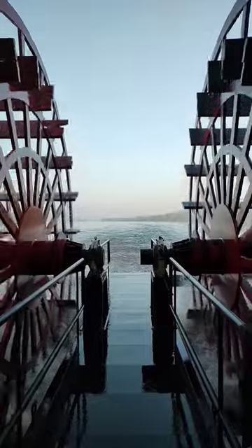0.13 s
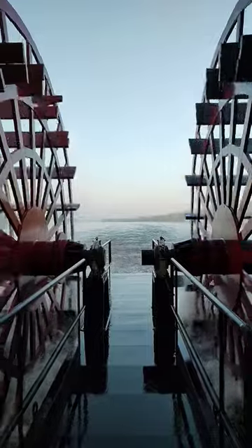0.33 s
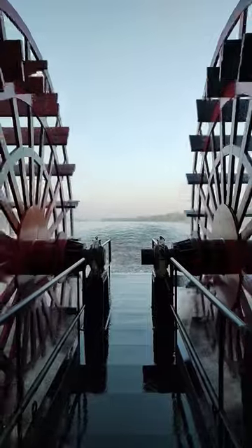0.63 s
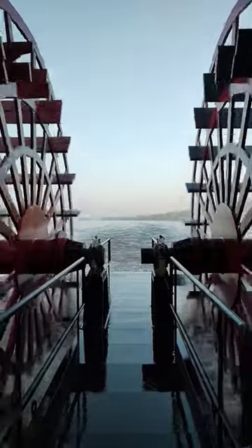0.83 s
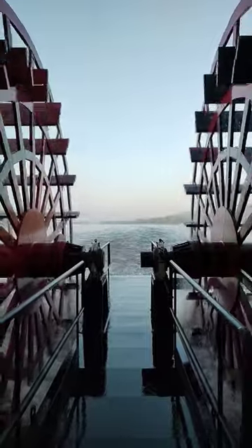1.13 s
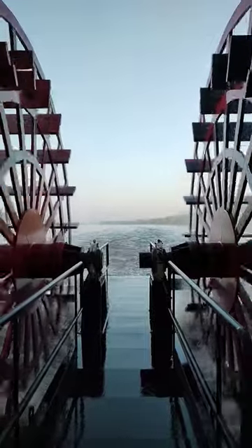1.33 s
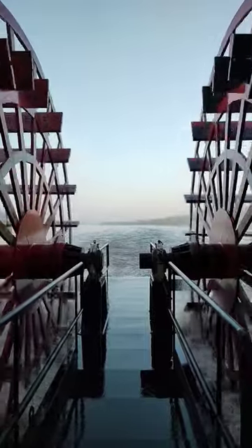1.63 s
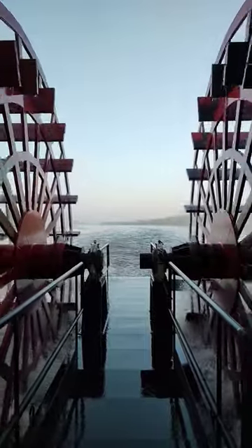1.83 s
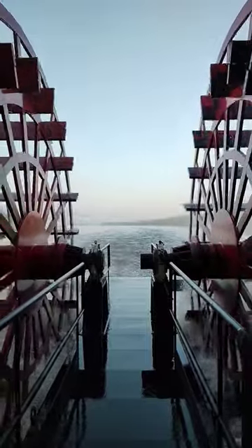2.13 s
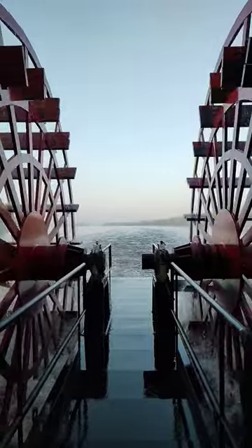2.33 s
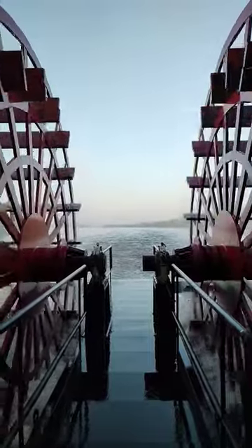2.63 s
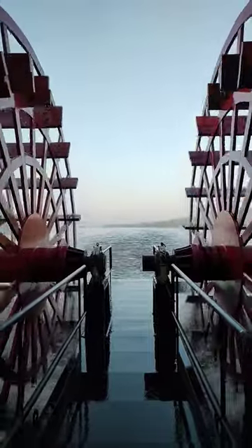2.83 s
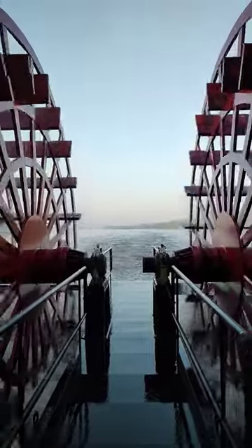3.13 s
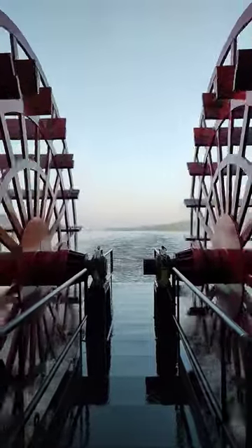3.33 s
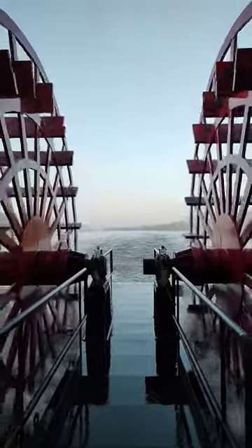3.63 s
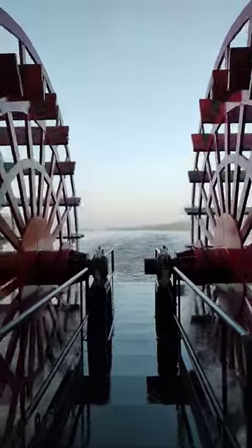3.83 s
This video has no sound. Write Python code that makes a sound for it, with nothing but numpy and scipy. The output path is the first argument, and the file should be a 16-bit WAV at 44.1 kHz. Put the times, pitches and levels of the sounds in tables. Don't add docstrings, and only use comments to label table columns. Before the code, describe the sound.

Paddle wheels throw water beside a boat's stern deck. Silence until 0.3 s, then an abrupt, near-full-scale broadband rush. Bright hissing spray swells gently about every 0.2 s, over bubbling wash, low engine drone, faint pump hum, gear whine and ringing metal. Churn is steady to 2.4 s; deep rumble surges near 2.5 and 2.95 s, wash grows fuller until 4 s. Outdoors, nearly mono, sharp treble, lightly saturated.

```python
import sys
import numpy as np
from scipy import signal
from scipy.fft import rfft, irfft, next_fast_len
from scipy.io import wavfile
from scipy.ndimage import uniform_filter1d, map_coordinates

SR = 44100
rng = np.random.default_rng(int(sys.argv[2]) if len(sys.argv) > 2 else 0)


def undo_db(level):
    steps = np.asarray(level, float) / 20
    return 10 ** steps


def output_pcm(signal):
    pcm = np.clip(np.atleast_2d(signal).T, -1, 1) * 32767
    wavfile.write(sys.argv[1], SR, np.round(pcm).astype(np.int16))


N = 176400
T = np.arange(N) / SR

# peak_s, hiss_swell_db, splash_swell_db, length_s
PADDLES = [(0.33, 3, 3, 0.069), (0.536, 2.5, 3.5, 0.17), (0.67, 2.5, 2, 0.16), (0.835, 3.5, 4, 0.18),
           (1.154, 3, 2.5, 0.28), (1.422, 3, 3.5, 0.19), (1.606, 1.5, 2, .08), (1.727, 4, 4, 0.15),
           (1.988, 4, 3, 0.21), (2.115, 2, 1.5, 0.092), (2.286, 3.5, 4, 0.072), (2.48, 2.5, 2, 0.12),
           (2.677, 2.2, 3, 0.18), (2.877, 1.2, 2, .14), (3.132, 2.5, 2, 0.22), (3.325, 1.3, 0.2, .15),
           (3.538, 2.5, 2, 0.18), (3.7, 4, 4.5, 0.11), (3.946, 3, 2.5, 0.17)]
# time_s, level_db
CHURN = [
    (.32, -23.5),
    (.43, -24),
    (.5, -21.5),
    (.58, -24.5),
    (2, -24.5),
    (2.36, -25),
    (2.55, -22.5),
    (3, -22),
    (3.55, -21),
    (4, -21),
]
# time_s, level_db
LOAD = [(0.4, -25.5), (0.58, -24.5), (0.99, -25.5), (1.01, -24.5), (2.37, -24.5), (2.51, -20),
        (2.54, -25.5), (2.95, -20.5), (3.32, -21.5), (3.33, -23.5), (3.4, -22), (4.0, -21.5)]
# freq_hz, density_db
HISS_SPECTRUM = [(3300, -44), (5600, -12.5), (6200, -6), (6900, -0.5), (7850, 1.5), (8600, -5.5),
                 (11500, -35.5), (15000, -55), (22000, -120)]
# freq_hz, density_db
SPLASH_SPECTRUM = [(1240, -30), (2100, -15), (2360, -16), (2810, -11.5), (3240, -0.5), (3800, -5),
                   (4300, -0.5), (6000, -2.5), (7800, -23), (13200, -120)]
# freq_hz, density_db
WASH_SPECTRUM = [(260, -38), (450, -2.5), (483, -6), (549, -6.5), (957, -3), (1450, -4.5), (1890, -1.5),
                 (2310, -12), (3000, -13), (3900, -43), (6600, -120)]
# freq_hz, density_db
MIST_SPECTRUM = [(5000, -45), (8600, 0), (10000, -5.5), (11800, -14), (13600, -13.5), (14600, -13.5),
                 (15300, -13), (15500, -11.5)]
# freq_hz, density_db
HULL_SPECTRUM = [(40, -23), (70, -9.5), (100, -3.5), (135, -3.5), (180, -3), (290, -1.5), (400, -3.5),
                 (530, -19.5), (800, -38), (1300, -120)]
# freq_hz, density_db
THUD_SPECTRUM = [(18, -50), (30, -25), (48, -7), (110, -1), (140, -37), (240, -120)]
ENGINE_HZ = [93, 120.3, 135, 160.7, 192, 201, 339, 396, 474]
# level_over_load_db, width_hz
ENGINE_LINES = [(-14, 11), (-8, 4.2), (-16, 12), (-9, 3.5), (-15.5, 5.5), (-14.5, 4.1), (-10.5, 14.4),
                (-15.5, 22), (-19.5, 8.4)]
PUMP_HZ = [749, 1720, 1772, 1891, 1934.7, 1966]
# level_over_churn_db, width_hz
PUMP_LINES = [(-21, 11), (-27, 7), (-18, 18), (-14, 16), (-13.5, 5.7), (-20, 18)]
# shaft_multiple, level_db
GEAR_LINES = [(51, -41), (52, -37), (53, -40), (54, -45), (55, -47), (56, -44)]
PANEL_HZ = [3365, 3972, 4480, 6853, 13571]
# level_db, width_hz
PANEL_LINES = [(-45, 50), (-54, 4.2), (-39, 170), (-32, 75), (-62, 40)]
# time_s, low_hz, high_hz
SIDE_BANDS = [(1.372, 4150, 5800), (1.372, 11700, 13100), (1.651, 6900, 8350), (1.651, 10350, 11750),
              (1.767, 13800, 15200), (1.813, 10350, 11750), (2.464, 5150, 6300), (2.464, 9650, 11750),
              (2.487, 13050, 15200), (2.696, 7550, 9050), (3.346, 8950, 10400), (3.346, 11000, 12500)]

START_S, RISE_S = 0.3097, 0.0012
TOP_HZ = 15480


def spray():
    hiss_swell_db, splash_swell_db = swells()
    churn_db = curve(CHURN)
    grown_db = uniform_filter1d(churn_db, size=SR // 2) - churn_db.min() - 1
    flutter_db = 0.5 * wobble(14) + 0.45 * wobble(45)
    hiss_db = -15.5 + hiss_swell_db - 0.083 * grown_db
    splash_db = -22.5 + splash_swell_db - 0.82 * grown_db
    hiss = undo_db(hiss_db) * coloured(wet_noise(depth_db=0.5), HISS_SPECTRUM)
    splash = undo_db(splash_db) * coloured(wet_noise(depth_db=1.0), SPLASH_SPECTRUM)
    return undo_db(flutter_db) * (hiss + splash)


def swells():
    peak_s, hiss_db, splash_db, length_s = np.transpose(PADDLES)
    coarse_s = T[::100]
    bumps = np.exp(-(2 * (coarse_s[:, None] - peak_s) / length_s) ** 2)
    return [np.interp(T, coarse_s, bumps @ db) for db in (hiss_db, splash_db)]


def wet_noise(depth_db):
    droplets = grains(per_s=2500, hz=5900, spread=0.4, cycles=3.3, scatter_db=4.0, size=64)
    return patchy(depth_db) + undo_db(-12.5) * droplets


def wash():
    surge_db = swells()[0]
    churn_db, load_db = curve(CHURN), curve(LOAD)

    bubbles = grains(per_s=500, hz=1218, spread=0.613, cycles=6.4, scatter_db=1.9, size=512)
    body_db = -1.5 + 0.72 * surge_db + 0.86 * wobble(12)
    body = undo_db(body_db) * coloured(patchy(depth_db=-1.0) + undo_db(-17.5) * bubbles, WASH_SPECTRUM)

    mist_db = -1 - 0.14 * (churn_db - churn_db.mean()) + 0.39 * surge_db
    mist_db = mist_db + 0.61 * wobble(12) + 0.87 * wobble(60)
    mist = undo_db(mist_db) * coloured(patchy(depth_db=0.7), MIST_SPECTRUM)

    hull = undo_db(-2 + 0.39 * wobble(5.75)) * coloured(patchy(depth_db=-0.07), HULL_SPECTRUM)
    thud_db = -13 + 0.9 * (load_db - load_db.mean())
    thud = undo_db(thud_db) * coloured(patchy(depth_db=0.0), THUD_SPECTRUM)
    return undo_db(churn_db) * (body + mist) + undo_db(load_db) * (hull + thud)


def engine():
    return undo_db(curve(LOAD)) * hums(np.c_[ENGINE_HZ, ENGINE_LINES])


def pump():
    return undo_db(curve(CHURN) + 1.2 * wobble(6.36)) * hums(np.c_[PUMP_HZ, PUMP_LINES])


def gearbox():
    shaft_hz = 84.08
    whine = np.zeros(N)
    for multiple, level_db in GEAR_LINES:
        level = undo_db(level_db - 0.5 + 2.5 * wobble(4.23))
        cycles = multiple * shaft_hz * T + 0.1 * wobble(5)
        whine += level * np.sqrt(2) * np.sin(2 * np.pi * cycles)
    return whine


def panels():
    return hums(np.c_[PANEL_HZ, PANEL_LINES])


def hums(rows):
    def resonances(f):
        total = 0
        for hz, level_db, width_hz in rows:
            height = undo_db(level_db) * np.sqrt(2 * SR / (np.pi * width_hz))
            total = total + height / (1 + (2 * (f - hz) / width_hz) ** 2)
        return total
    return filtered(rng.standard_normal(N), resonances)


def grains(per_s, hz, spread, cycles, scatter_db, size):
    u = rng.random((4 * 4000, 3))
    at_s = np.cumsum(-np.log(1 - u[:, 0])) / per_s
    inside = at_s < T[-1]
    u, at_s = u[inside], at_s[inside]
    pitch_hz = np.clip(hz * np.exp(spread * np.sqrt(12) * (u[:, 1:2] - 0.5)), 100, SR / 2.5)
    turns = pitch_hz * np.arange(size) / SR
    level = undo_db(-scatter_db * np.log(1 - u[:, 2:]))
    chirp = np.sin(2 * np.pi * turns * (1 + 0.028 * turns / cycles))
    rows = level * np.exp(-2 * turns / cycles) * chirp
    index = (at_s * SR).astype(int)[:, None] + np.arange(size)
    x = np.bincount(index.ravel(), rows.ravel(), N + size)[:N]
    f, power = signal.welch(x, SR, nperseg=128)
    flatten = 1 / np.sqrt(power + 0.02 * power.max())
    return unit(filtered(x, lambda q: np.interp(q, f, flatten)))


def patchy(depth_db):
    z = signal.stft(rng.standard_normal(N + 512), nperseg=512)[2]
    field = uniform_filter1d(rng.standard_normal(z.shape), size=8, axis=0)
    field = uniform_filter1d(field, size=9, axis=1)
    return unit(signal.istft(z * undo_db(depth_db * unit(field)), nperseg=512)[1][:N])


def coloured(x, points):
    f, db = np.transpose(points)
    return unit(filtered(x, lambda hz: undo_db(np.interp(np.log(hz + 1), np.log(f + 1), db))))


def filtered(x, response):
    m = next_fast_len(N + 8192)
    return irfft(rfft(x, m) * response(np.fft.rfftfreq(m, 1 / SR)), m)[..., :N]


def wobble(rate):
    knots = rng.standard_normal(int(N * rate / SR) + 4)
    return np.interp(T, T[::50], map_coordinates(knots, [T[::50] * rate]))


def curve(rows):
    return np.interp(T, *np.transpose(rows))


def unit(x):
    return x / np.std(x)


def scene():
    mono = spray() + wash() + engine() + pump() + gearbox() + panels()
    return np.tile(mono, (2, 1))


def settling_bass(x):
    def bass_cut(edge_hz):
        return filtered(x, lambda hz: 1 / np.sqrt(1 + (edge_hz / (hz + 1e-3)) ** 4))
    settle_s = 0.25
    opened = 1 - np.exp(-(np.clip(T - START_S, 0, 4) / settle_s) ** 2)
    return opened * bass_cut(38) + (1 - opened) * bass_cut(110)


def limited(x):
    ceiling, knee = 0.9, 5
    x = x / (1 + np.abs(x / ceiling) ** knee) ** (1 / knee)
    return filtered(x, lambda hz: (hz > 4) & (hz < TOP_HZ))


def holed(x):
    per_s, half_s, width_hz, from_hz, gap_db = 7, 0.008, 690, 11700, -15
    hz, t, z = signal.stft(x, SR, nperseg=512)
    for u, v, w in rng.random((4 * per_s, 3)):
        low_hz = from_hz + width_hz * np.floor(v * (TOP_HZ - from_hz) / width_hz + 0.4)
        band = (hz > low_hz) & (hz < low_hz + width_hz)
        moment = np.abs(t - 4 * u) < half_s * (1 + w ** 2)
        z[np.ix_(band, moment)] *= undo_db(gap_db)
    return signal.istft(z, SR, nperseg=512)[1][:N]


def separate(mono):
    fill_s, fill_db = 0.047, -2.5
    side = np.zeros(N)
    t, hz = np.arange(-2048, 2048) / SR, np.fft.rfftfreq(4096, 1 / SR)
    window = np.cos(np.pi * np.clip(t / fill_s, -0.5, 0.5))
    for time_s, low_hz, high_hz in SIDE_BANDS:
        middle = round(time_s * SR)
        block = slice(middle - 2048, middle + 2048)
        inside = (hz > low_hz) & (hz < high_hz)
        level = undo_db(fill_db) * np.std(irfft(rfft(mono[block]) * inside))
        noise = unit(irfft(rfft(rng.standard_normal(4096)) * inside))
        side[block] += level * window * noise
    return side * [[1], [-1]]


def roll_off(x):
    return signal.sosfilt(signal.butter(12, 16310, fs=SR, output="sos"), x)


def record(dry):
    x = holed(limited(settling_bass(dry[0])))
    started = np.clip((T - START_S) / RISE_S, 0, 1)
    mix = (x + separate(x)) * started
    return roll_off(mix)


dry = scene()
out = record(dry)
output_pcm(out)
```